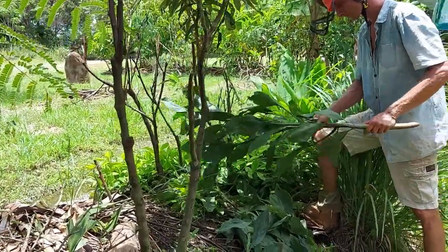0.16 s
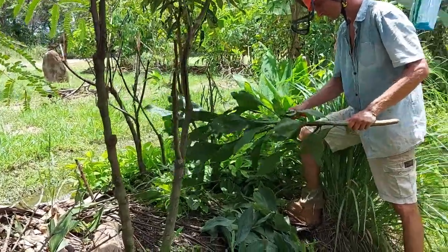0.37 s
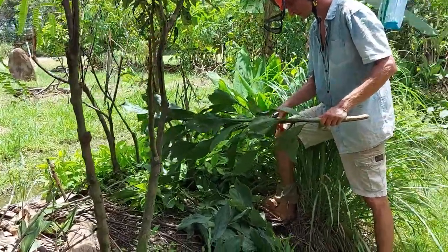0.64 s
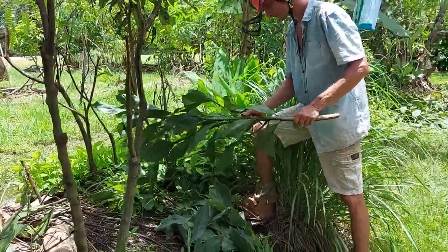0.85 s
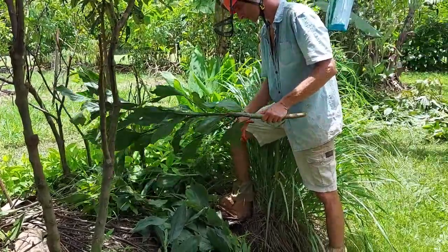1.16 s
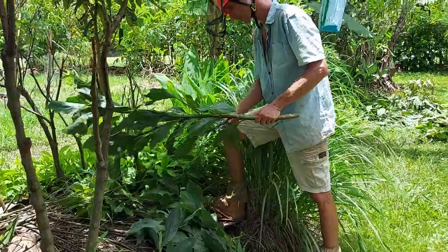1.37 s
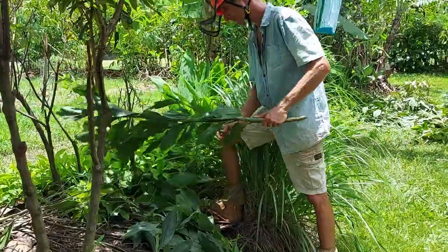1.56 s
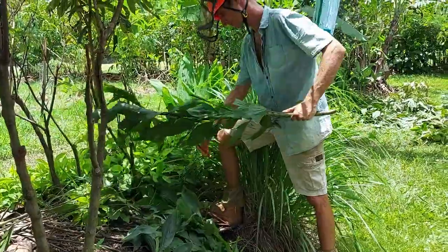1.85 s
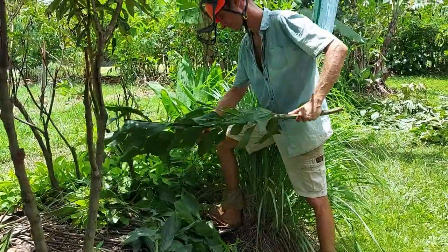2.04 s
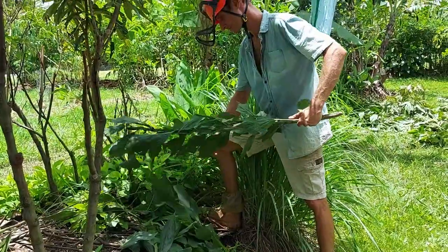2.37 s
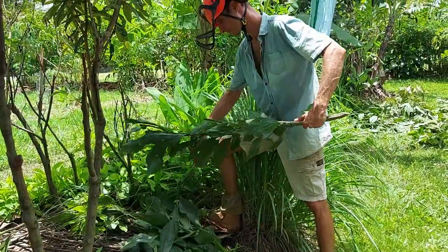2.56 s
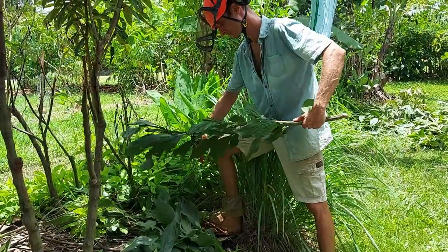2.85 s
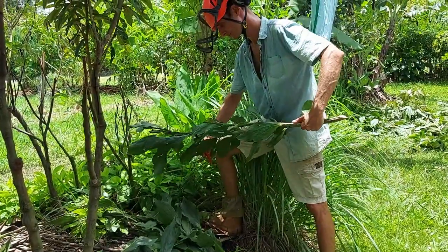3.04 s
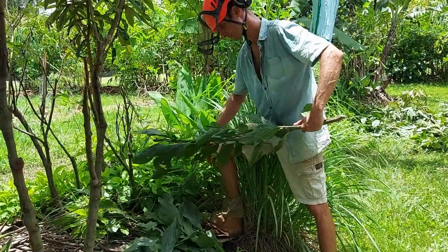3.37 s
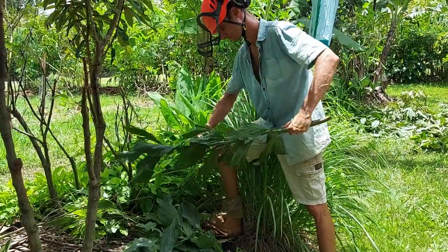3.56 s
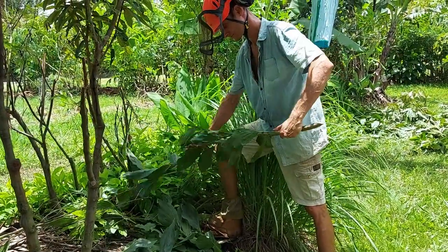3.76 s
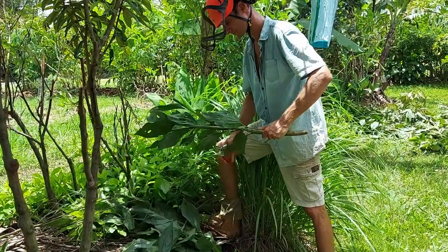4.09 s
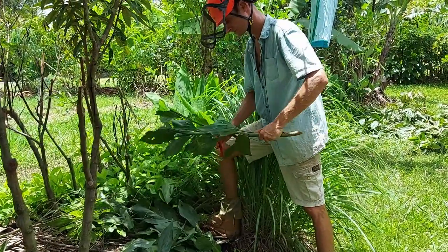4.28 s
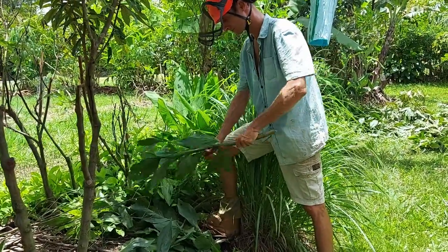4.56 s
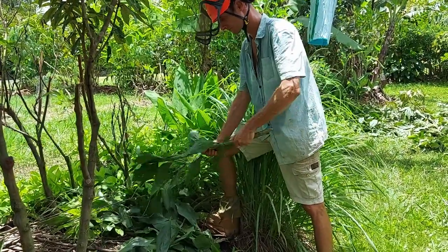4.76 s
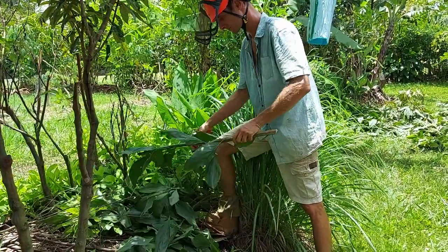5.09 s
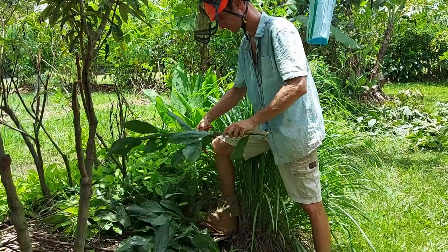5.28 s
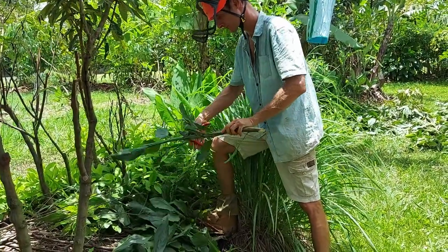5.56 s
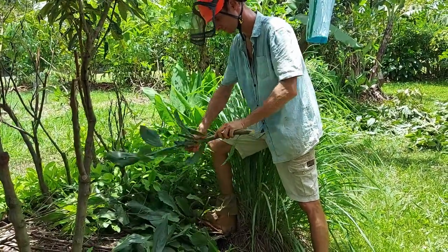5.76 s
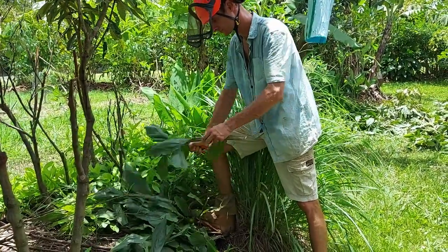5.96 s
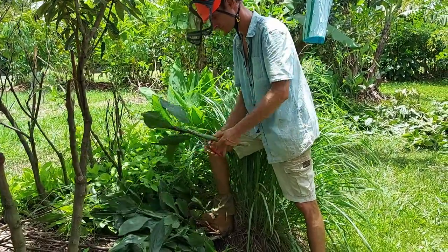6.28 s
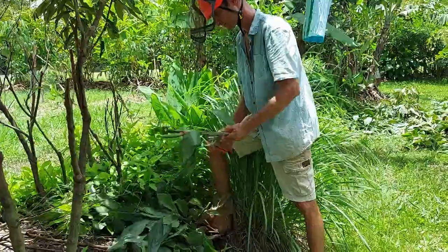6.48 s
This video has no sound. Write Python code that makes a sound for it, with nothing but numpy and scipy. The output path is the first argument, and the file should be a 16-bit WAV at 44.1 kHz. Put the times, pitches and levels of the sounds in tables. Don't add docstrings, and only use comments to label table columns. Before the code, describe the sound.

Hand shears snip leafy stems in seven irregular, crisp crunching cuts, with leaf rustle and dull twig knocks over a steady high cicada hiss.

```python
import sys
import numpy as np
from scipy import signal
from scipy.fft import rfft, irfft, next_fast_len
from scipy.io import wavfile
from scipy.ndimage import uniform_filter1d

SR = 44100
rng = np.random.default_rng(int(sys.argv[2]) if len(sys.argv) > 2 else 0)


def ratio_of_db(decibels):
    return 10 ** (np.asarray(decibels, float) / 20)


def put_to_file(sound):
    columns = np.atleast_2d(sound).T
    safe = np.clip(columns, -1, 1)
    whole_steps = np.round(safe * 32767)
    wavfile.write(sys.argv[1], SR, whole_steps.astype(np.int16))


N = 292383
T = np.arange(N) / SR


def level(x, db):
    return x * ratio_of_db(db) / np.sqrt(np.mean(x ** 2))


def colour(x, points):
    hz, db = np.transpose(points)
    size = next_fast_len(N)
    log_hz = np.log(np.maximum(np.fft.rfftfreq(size, 1 / SR), 1))
    gain = ratio_of_db(np.interp(log_hz, np.log(hz), db))
    return irfft(rfft(x, size) * gain, size)[..., :N]


def band(x, lo_hz, hi_hz, order=2):
    limits = [lo_hz, min(hi_hz, .45 * SR)]
    return signal.sosfilt(signal.butter(order, limits, "band", fs=SR, output="sos"), x)


def ring(x, modes, passes=1):
    out = 0
    for k, (hz, width_hz, db) in enumerate(modes):
        y = x
        for _ in range(passes):
            y = signal.lfilter(*signal.iirpeak(hz, hz / width_hz, SR), y)
        out = out + (-1) ** k * ratio_of_db(db) * y
    return out


def walk(rate_hz, channels=2):
    k = int(SR / rate_hz)
    held = np.repeat(rng.standard_normal((channels, N // k + 1)), k, axis=1)
    return 1.3 * uniform_filter1d(uniform_filter1d(held, k), k)[:, :N]


def ports(share_hz, spike_db=0.):
    spikes = np.minimum(rng.exponential(size=(3, N)), 5)
    left_right, shared = np.split(rng.standard_normal((3, N)) * ratio_of_db(spike_db * spikes), [2])
    low = signal.butter(2, share_hz, fs=SR, output="sos")
    return level(left_right + signal.sosfiltfilt(low, shared - left_right), 0)


def sides(pan_db):
    return ratio_of_db(np.array([pan_db, -pan_db]) / 2)


def swell(s, rise_s, t60_s, hold_s=0):
    rise, fall, out = max(rise_s, 1e-5), max(t60_s, 1e-3) / np.log(1000), np.zeros(N)
    part = slice(max(int((s - 12 * rise) * SR), 0), int((s + hold_s + 12 * fall) * SR))
    growing = np.minimum((T[part] - s) / rise, 0)
    dying = np.maximum(T[part] - s - hold_s, 0) / fall
    out[part] = np.exp(growing - dying)
    return out


def clicks(rate_hz, jitter):
    rate = rate_hz * (1 + jitter * walk(6, channels=1)[0])
    return (np.cumsum(rate) / SR + rng.random()) % 1


# (time [s], level [dB])
SONG = [(0.0, -47), (0.37, -47), (0.9, -46), (1.6, -47), (2.64, -45), (3.3, -46), (3.56, -45), (3.88, -47),
        (5.02, -47), (5.3, -46), (5.54, -46), (6.63, -45)]
# (pitch [Hz], width [Hz], level [dB])
SHRILL_LEFT = [(9162, 720, -3), (9930, 890, -7.5), (10700, 2300, -19.5)]
SHRILL_RIGHT = [(8820, 1220, 7), (10640, 510, -4), (11500, 500, -24.5)]
# (pitch [Hz], level [dB per Hz])
FAR = [(2600, -67), (2950, -18), (3300, -12.5), (3900, 3), (5100, 0), (6200, 3.5), (7300, -2.5),
       (9000, -12.5), (11500, -4), (13500, -13.5), (16000, -20.5)]


def cicadas():
    shrill_pan_db, far_db, low_db = 3 + .3 * T, -53 - .35 * T, -57
    shrill_db = np.interp(T, *np.transpose(SONG))
    throb = np.array([1.8 + np.exp(-clicks(115, 0.016) / 0.24) + 1.2 * np.exp(-clicks(515, 0.017) / .4)
                      for _ in range(2)])
    hiss = rng.standard_normal((2, N)) * throb * ratio_of_db(0.89 * walk(30))
    shrill = np.array([level(ring(x, modes, passes=2), 0)
                       for x, modes in zip(hiss, (SHRILL_LEFT, SHRILL_RIGHT))])
    shrill = shrill * ratio_of_db(shrill_db + 2.8) * sides(shrill_pan_db)

    trains = [ratio_of_db(db) * (np.diff(clicks(hz, .0014), prepend=0) < 0)
              for hz, db in ((117.6, 0), (119.3, 0), (114.1, -8))]
    left = sum(trains)
    right = sum(np.roll(x, 5 * k) * ratio_of_db(-1.5 * k) for k, x in enumerate(trains[::-1]))
    crowd = level(np.array([left, right]), 0) + level(ports(3500), -1.0)
    drum = band(ring(crowd, [(2236, 258, 0)], passes=2), 1960, 2505, order=5)
    drum = level(drum, 0.32) * ratio_of_db(low_db) * sides(2.1)[:, None]

    far = level(colour(rng.standard_normal((2, N)), FAR), 2.4) * sides(-2.2)[:, None]
    return shrill + drum + far * ratio_of_db(far_db + 0.54 * walk(9.8))


# (time of the peak [s], level [dB], left minus right [dB], dying away [s])
GUSTS = [(.42, -80, 2, .9), (.7, -79, 2, .35), (.83, -75, 1, .4), (1.0, -80, 1, 1.2), (1.18, -80, -6, .4),
         (1.29, -72, -6, .35), (1.5, -75, 4, .35), (1.73, -77, 0, .6), (1.8, -79, -2, 1.2),
         (2.31, -69, 2, .2), (2.46, -77, -2, .3), (2.58, -70, .5, .4), (3.56, -76, -9, .3),
         (3.66, -66, -20, .3), (3.71, -55, -8, .25), (3.95, -68, 1, .3), (4.54, -80, 2, .9),
         (4.69, -74, 1, .5), (5.1, -77, 0, .6), (5.37, -76, 0, 1.2), (5.65, -71, -1, .3),
         (5.76, -78, 9, .4), (5.85, -67, -8.5, .35), (6.0, -68, 3, .9), (6.13, -76, 0, .4),
         (6.26, -81, 1, 1.5)]
# (time [s], peak level [dB], pitch [Hz], dying away [s])
PUFFS = [
    (3.57, -57, 70, .05),
    (3.655, -40, 65, .07),
    (5.65, -60, 60, .06),
]
# (pitch [Hz], level [dB per Hz])
AIR = [(18, -33), (30, -8), (91, 9.5), (282, 3.5), (564, -0.5), (1320, -55), (1770, -1), (1900, 5.5),
       (2470, -26), (4180, -120)]


def air():
    calm_db, gust_rise_s, hum_db = -88, .035, -81.5
    gusts = sum(ratio_of_db(db) * sides(pan_db)[:, None] * swell(s, gust_rise_s, t60)
                for s, db, pan_db, t60 in GUSTS)
    wind = ratio_of_db(calm_db) + gusts
    rumble = level(band(ports(63), 43, 139, order=3), 0) * wind * ratio_of_db(3.0 * walk(14))
    for s, peak_db, hz, t60 in PUFFS:
        rumble[1] += ratio_of_db(peak_db) * swell(s, 0.0087, t60) * np.sin(2 * np.pi * hz * (T - s))
    hum = level(colour(ports(1000), AIR), hum_db) * ratio_of_db(1.4 * walk(15))
    return rumble + hum


# (start [s], held [s], level [dB], dying away [s])
RUSTLES = [(.03, .25, -74, .5), (.77, .4, -77, .5), (1.17, .36, -69, .4), (1.65, .19, -65, .25),
           (1.93, .1, -63, .25), (2.16, .13, -66, .3), (2.39, .2, -65, .3), (3.3, .22, -80, .5),
           (3.72, .13, -62, .3), (3.85, .11, -58, .25), (4.28, .03, -76, .5), (4.66, .06, -60, .2),
           (4.74, .14, -69, .3), (4.94, .22, -75, .3), (5.19, .16, -65, .35), (5.79, .08, -62, .2),
           (5.94, .09, -60, .25), (6.05, .1, -71, 1.3), (6.39, .02, -78, .5)]
# (pitch [Hz], level [dB per Hz])
LEAF = [(120, -15), (280, -3), (420, -8), (1200, 2), (2000, 2), (2700, -4), (5000, -7), (9000, -53)]


def leaves():
    still_low_db, still_top_db, shaken_top_db, shake_rise_s = -82.5, -70.5, -4, .01
    shake = sum(ratio_of_db(db) * swell(s, shake_rise_s, t60, hold) for s, hold, db, t60 in RUSTLES)
    low_gain = ratio_of_db(still_low_db) + shake
    top_gain = np.hypot(ratio_of_db(still_top_db), ratio_of_db(shaken_top_db) * shake)
    low = level(colour(ports(3400, spike_db=6.0), LEAF), -0.6) * sides(2.5)[:, None]
    top = level(band(ports(2700, spike_db=2.5), 6000, 16000, order=4), 0.83)
    patches_db = 2.5 * walk(35, channels=1) + 1.73 * walk(150, channels=1)
    return low * low_gain * ratio_of_db(patches_db) + top * top_gain * ratio_of_db(0.72 * walk(25))


# (time [s], peak level [dB], pitch [Hz], dying away [s])
KNOCKS = [(.271, -47.5, 1360, .03), (1.18, -49.5, 622, .056), (1.34, -56, 1910, .055),
          (1.699, -47.5, 1300, .05), (1.757, -49, 303, .04), (1.938, -48.5, 1670, .065),
          (1.999, -42.5, 795, .033), (3.495, -52.5, 1880, .068), (3.88, -39, 1140, .09),
          (4.614, -40, 1600, .06), (1.445, -42, 1600, .05), (4.949, -53, 1420, .05),
          (5.039, -55.5, 1760, .066), (5.198, -50, 1560, .079), (5.249, -53, 1600, .041),
          (5.32, -55, 900, .05), (.035, -60, 1500, .04), (.095, -60, 1500, .04), (1.222, -52, 1750, .03),
          (5.392, -51, 1530, .038), (5.471, -43.5, 1440, .065), (5.79, -50, 1920, .05),
          (5.937, -61, 1370, .05), (6.004, -36.5, 1000, .05), (6.013, -42, 840, .04)]
# (time [s], peak level [dB], pitch [Hz], dying away [s])
DROPS = [(.167, -52, 1470, .098), (1.258, -52.5, 1630, .069), (1.724, -46, 1510, .084),
         (1.79, -52.5, 1500, .095), (2.229, -55, 315, .1), (2.278, -57.5, 1700, .11),
         (2.41, -52, 1260, .08), (2.438, -45, 1150, .094), (2.47, -50, 305, .06), (2.555, -51, 900, .05),
         (2.577, -51, 1580, .074), (3.898, -44, 1130, .04), (3.929, -51, 1640, .034),
         (4.68, -45, 1345, .09), (4.718, -53, 220, .039), (5.964, -52, 520, .15), (6, -30, 1330, .029),
         (6.008, -35.5, 560, .032), (6.404, -58.5, 1900, .076)]


def twigs():
    out, push = np.zeros((2, N)), ports(5200, spike_db=-0.1)
    hits = [(*row, 2.2, -16) for row in KNOCKS] + [(*row, 1.4, -7.5) for row in DROPS]
    for s, peak_db, hz, t60, pan_db, thud_db in hits:
        part = slice(max(int((s - .05) * SR), 0), int((s + .3) * SR))
        blow = (swell(s + 0.0018, 0.0034, t60) * push)[:, part]
        tone = ring(blow, [(hz, hz / 3.7, 0)], passes=2)
        thud = ratio_of_db(thud_db) * band(blow, 204, 1600, order=3)
        knock = tone + thud + ratio_of_db(-55) * blow
        out[:, part] += ratio_of_db(peak_db + 13.5) * sides(pan_db)[:, None] * knock
    return out


# (time [s], peak level [dB], wood body [dB], top sparkle [dB], leafy tail [dB])
SNAPS = [
    (0.826, -22.5, -18, -28, -12.5),
    (1.4591, -11.5, -21, -15, -14.5),
    (2.1894, -23.5, -9, -9, -5.5),
    (3.697, -13.5, -0.5, -13, -9.5),
    (4.6326, -14.5, -5.5, -12, -12),
    (5.4722, -26, -16, -14, -9),
    (5.8415, -11.5, -9, -6, -14),
]
# (time [s], peak level [dB], wood body [dB], top sparkle [dB])
BITES = [(0.774, -40.5, -2, -8), (0.806, -44, 8, -6), (0.8154, -41, 0, -20), (0.8284, -41.5, -4, 11),
         (1.2674, -47, 10, -2), (1.443, -44, 0, -11), (1.4466, -35, -1, -12), (2.168, -59, 12, 18),
         (2.1772, -35, 2, -10), (3.6644, -28, -2, -4.5), (3.6755, -18, -7, -12), (3.7094, -34.5, -10, 7),
         (4.597, -37, -10, -22), (4.622, -29, 5, -10), (4.6375, -29.5, -16, 13.5), (4.6484, -47.5, -15, 11),
         (4.7113, -43, 7.5, 0), (5.8285, -31, 3, -3)]
# (time [s], peak level [dB], top sparkle [dB], rise [s])
CRUNCH = [(0.8256, -38, -8, .019), (1.458, -26.5, -7, .02), (2.189, -37, -4, .021),
          (3.694, -22.5, -19, .017), (4.632, -24, -6, .007), (4.622, -28, -6, .005), (5.47, -53, -16, .012),
          (5.84, -24.5, -8, .022)]
# (time [s], then level change of the four lowest blade tones [dB])
GRIP = [(.825, 4, -1, 0, 0), (1.459, -2, 4.5, 1, 2.5), (2.189, -0.5, 2.5, 1, -2.5),
        (3.697, -4.5, -1.5, 1, -2.5), (4.632, -1, -3, 1, 2), (5.471, -2.5, -2, 0, -3.5),
        (5.841, -1, -1, -1.1, 1)]
# (pitch [Hz], width [Hz], level [dB])
BLADE = [(2193, 494, -7.5), (3600, 365, -3), (4980, 500, -11.5), (6110, 324, 1), (8180, 440, -11)]
WOOD = [(279, 174, -18.5), (800, 265, -12.5), (1400, 280, -2), (1667, 950, -6.5)]
EDGE = [(10730, 320, -3), (12900, 1800, 1), (12800, 750, 2.5), (14800, 840, -7.5)]


def shears():
    steel, stem, crack = np.zeros((3, N))
    for s, peak_db, body_db, top_db, tail_db in SNAPS:
        hold = .0062 + .00015 * body_db
        splinter = (T > s) * swell(s + hold, 0.011, 0.01)
        hit = ratio_of_db(0.5) * swell(s, .0001, 0.0019)
        leafy_tail = ratio_of_db(tail_db) * swell(s, 0.00072, 0.23)
        shape = splinter + hit + leafy_tail
        steel += ratio_of_db(peak_db) * shape
        stem += ratio_of_db(peak_db + body_db) * shape
        crack += ratio_of_db(peak_db + top_db) * shape

    bites = [(*row, .037, .0011) for row in BITES]
    crunches = [(s, db, -4, top_db, .005, rise) for s, db, top_db, rise in CRUNCH]
    for s, peak_db, body_db, top_db, t60, rise in bites + crunches:
        shape = ratio_of_db(peak_db) * swell(s, rise, t60)
        steel += shape
        stem += ratio_of_db(body_db) * shape
        crack += ratio_of_db(top_db) * shape

    push = ports(2400, spike_db=1.5)
    push *= ratio_of_db(2.0 * walk(500, channels=1))
    for row in [*SNAPS, *BITES]:
        push[:, int(row[0] * SR) + 1] = 4.5

    s, *grip_db = np.transpose(GRIP)
    cut = np.searchsorted((s[1:] + s[:-1]) / 2, T)
    gripped = [(hz, width, db + extra[cut]) for (hz, width, db), extra in zip(BLADE, grip_db)]
    modes = [*gripped, *BLADE[len(grip_db):]]
    blade = ring(steel * push, modes) + ratio_of_db(-14) * band(steel * push, 2330, 10100)
    wood = band(ring(stem * push, WOOD), 120, 2500)
    sparkle = band(ring(crack * push, EDGE), 10200, 16500)
    return ratio_of_db(2) * blade + ratio_of_db(3.5) * wood + ratio_of_db(7) * sparkle


def echo(work):
    shared = .3
    tail = rng.standard_normal((2, 4000)) * ratio_of_db(-60 * np.arange(4000) / SR / 0.074)
    tail[1] = shared * tail[0] + np.sqrt(1 - shared ** 2) * tail[1]
    dull = band(work, 220, 4300, order=1)
    return ratio_of_db(-31) * signal.fftconvolve(dull, tail, axes=1)[:, :N]


def scene():
    garden = cicadas() + air()
    work = leaves() + twigs() + shears()
    work[1] = np.roll(work[1], 4)
    return garden + work + echo(work)


def band_limit(x):
    return signal.sosfilt(signal.butter(12, 15840, fs=SR, output="sos"), x)


def record(dry):
    firm = signal.sosfilt(signal.butter(1, 35, "high", fs=SR, output="sos"), dry)
    return band_limit(firm)


dry = scene()
out = record(dry)
put_to_file(out)
```